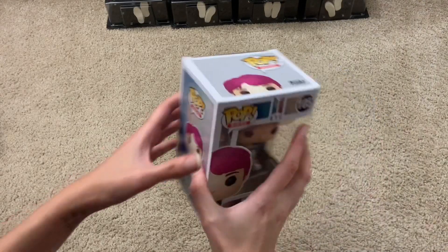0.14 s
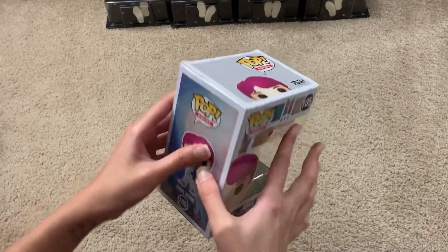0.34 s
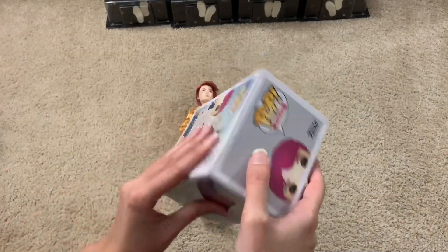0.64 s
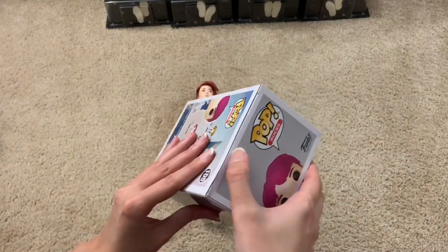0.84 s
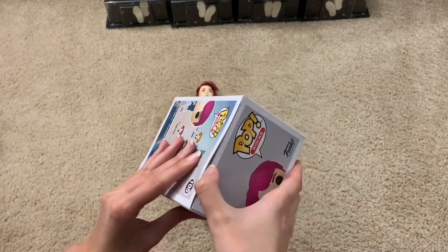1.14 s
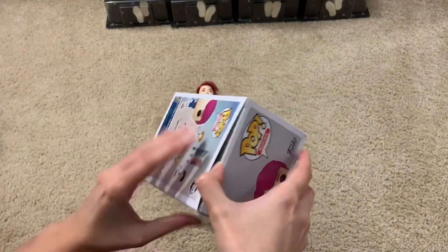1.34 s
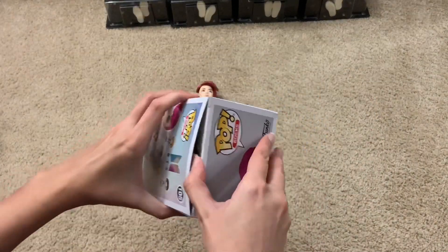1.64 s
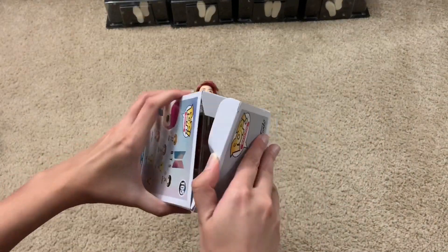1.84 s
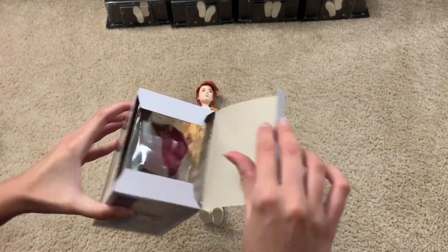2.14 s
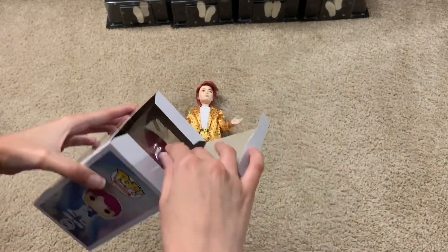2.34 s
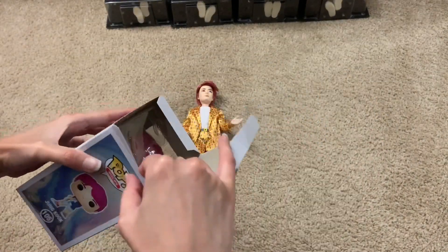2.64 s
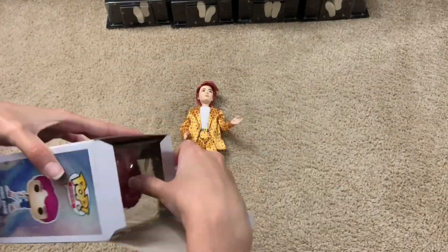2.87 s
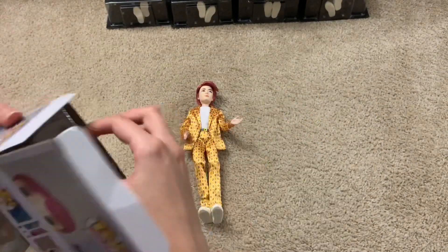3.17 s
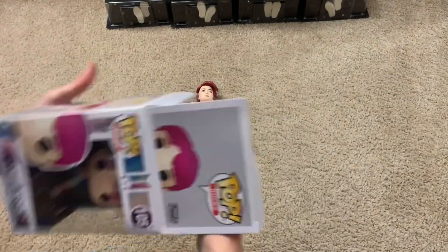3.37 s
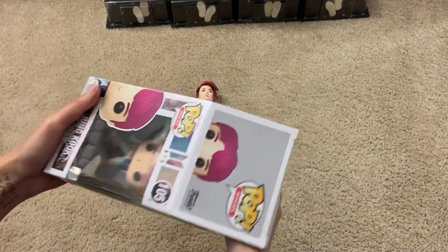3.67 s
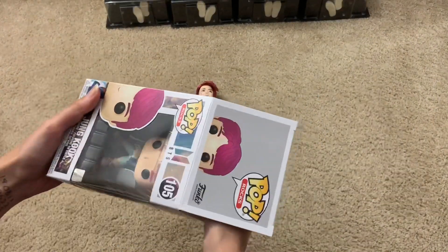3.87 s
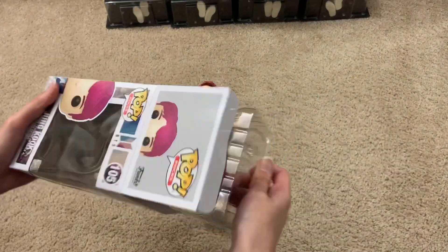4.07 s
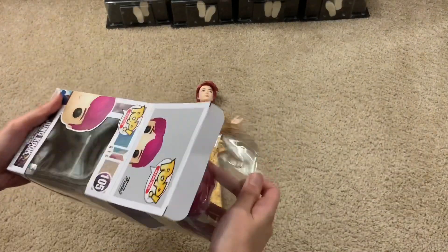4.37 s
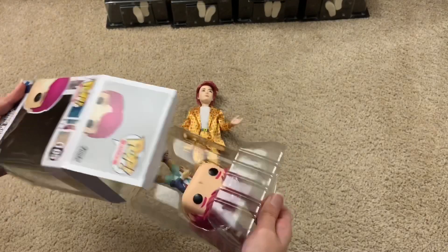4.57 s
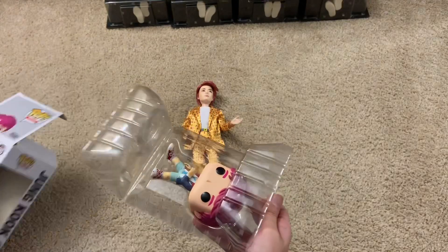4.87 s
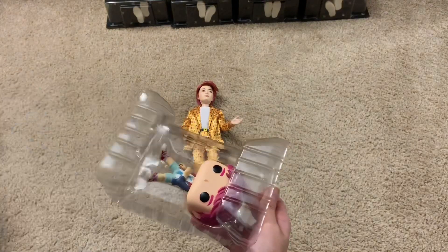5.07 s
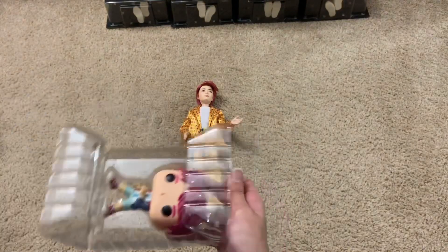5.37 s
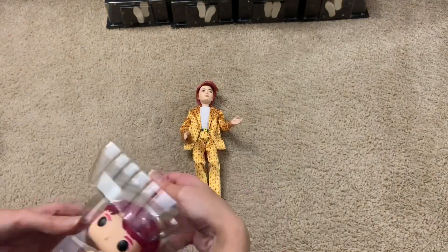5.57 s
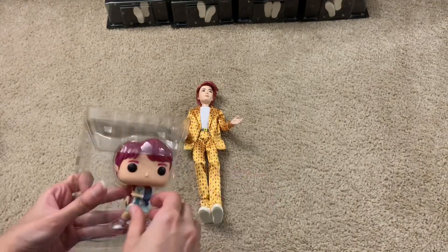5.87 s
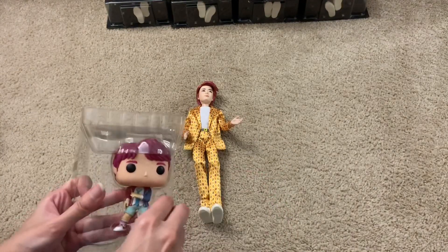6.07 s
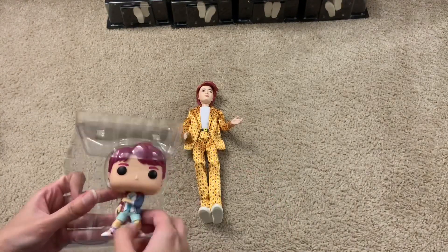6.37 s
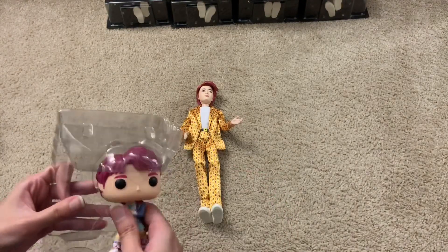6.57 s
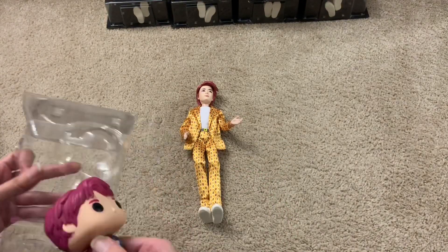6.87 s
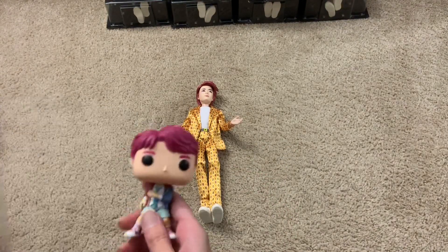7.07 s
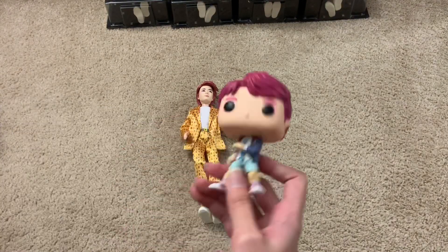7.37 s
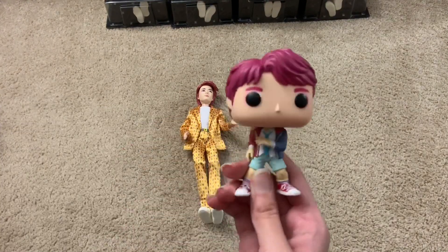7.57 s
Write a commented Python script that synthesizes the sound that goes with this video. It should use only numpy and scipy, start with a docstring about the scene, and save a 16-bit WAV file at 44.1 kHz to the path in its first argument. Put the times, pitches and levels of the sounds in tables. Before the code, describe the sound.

Very close stereo pickup, slightly left, in a small dull room with quiet low room tone and a faint motor hum. From 0 to 0.9 s hands turn a light card box: soft rubbing, dull ticks and one loud hollow knock near 0.36 s, with faint hiss and low air rumble fading by about 2 s. Sparse faint ticks follow until sharp flap snaps at 1.8 to 1.95 s. From 2 to 3.7 s there are small clicks, light card rustle and a soft box tap near 2.7 s. A hard snap at 3.76 s leads to the loudest cluster, 4.0 to 4.5 s, bright cracks and crinkling rubs as thin plastic slides out. Then lighter clicks, six very faint even blips around 5.2 to 5.5 s, crisp plastic ticks at 5.6 to 6.9 s, and sparse soft taps to the end. A distant engine drone rises, drops and settles, almost inaudible.

```python
"""Hands turn a small card box, open its flaps and draw out a thin plastic tray over a carpet.
Card and plastic snap as filtered noise bursts and rustle as gated friction noise; three knocks, one of
them loud, ring the box as decaying sines. Later come six even blips. A motor hums on two sines, a far
engine (one gliding sine) climbs, changes gear and settles; low air rumble and faint hiss open the scene."""
import sys
import numpy as np
from scipy import signal
from scipy.fft import rfft, irfft
from scipy.io import wavfile

SR = 44100
rng = np.random.default_rng(int(sys.argv[2]) if len(sys.argv) > 2 else 0)


def put_to_file(sound):
    """Save the sound as 16-bit audio at rate SR, in the file named by the first command-line argument."""
    columns = np.atleast_2d(sound).T  # one column per channel
    safe = np.clip(columns, -1, 1)
    whole_steps = np.round(safe * 32767)
    wavfile.write(sys.argv[1], SR, whole_steps.astype(np.int16))


N = 340011
RIGHT_LAG_S = 6e-5   # the box sits nearer the left port


def amp(db):
    """dB to gain."""
    return 10 ** (np.asarray(db) / 20)


def rms_one(x):
    """Scale to rms 1."""
    return x / np.sqrt(np.mean(x ** 2) + 1e-20)


def peak_one(x):
    """Scale to peak 1."""
    return x / (np.max(np.abs(x)) + 1e-20)


def in_time(rows):
    """Table columns after t/s as curves, one value a sample."""
    s, *columns = np.transpose(rows)
    return [np.interp(np.arange(N) / SR, s, c) for c in columns]


def resonate(x, hz, width_hz):
    """Two-pole resonance, gain about 1 on top."""
    r = np.exp(-np.pi * width_hz / SR)
    angle = 2 * np.pi * min(hz, SR / 2.2) / SR
    return signal.lfilter([(1 - r * r) / 2, 0, (r * r - 1) / 2], [1, -2 * r * np.cos(angle), r * r], x)


def body(x, peaks):
    """Resonances in parallel."""
    return sum(amp(db) * resonate(x, hz, width_hz) for hz, width_hz, db in peaks)


def band(x, low_hz, high_hz):
    """Butterworth band-pass."""
    return signal.sosfilt(signal.butter(2, [low_hz, high_hz], "band", fs=SR, output="sos"), x)


def drift(rate_hz):
    """Slow chance: straight lines between normal draws of spread 1."""
    steps = rng.standard_normal(int(N / SR * rate_hz) + 2)
    return np.interp(np.arange(N) / SR * rate_hz, np.arange(len(steps)), steps)


# shading by the housing: f/Hz, left re right/dB
PORT_SHADING = [(100, 4.5), (500, 3), (2500, 3), (5000, 1), (9000, -2), (14000, 0)]


def ports(x, lag_s):
    """Two channels, the right delayed by lag_s; the housing shades each by half the level difference."""
    hz = np.fft.rfftfreq(len(x), 1 / SR)
    shade_hz, shade_db = np.transpose(PORT_SHADING)
    tilt = amp(np.interp(np.log(hz + 1), np.log(shade_hz), shade_db) / 2)
    delay = np.exp(-2j * np.pi * hz * lag_s)
    return irfft(rfft(x) * [tilt, delay / tilt], len(x))


# ticks and snaps: t/s, level/dB, panel f/Hz, relative crack level/dB, relative thud level/dB, t60/s
PANEL_SNAPS = [(0.236, -30, 775, -7, -9, 0.15), (0.258, -24.5, 492, -17, -6, 0.15),
               (0.318, -22.5, 487, -18, 4, 0.15), (0.362, -4, 577, -11, 21, 0.021),
               (0.497, -35, 535, -24, 3, 0.045), (0.553, -43, 988, -23, -7, 0.061),
               (0.598, -17.5, 586, -20.5, -8, 0.15), (0.638, -19.5, 540, -22, -4, 0.13),
               (0.7, -21, 988, -19, 7, 0.033), (0.724, -27.5, 560, -26, -5, 0.043),
               (0.735, -21.5, 616, -12, 4, 0.05), (0.822, -32, 530, -26, 6, 0.11),
               (0.844, -24, 1510, -37, -27, 0.15), (0.892, -30.5, 1150, -34, -19, 0.034),
               (1.093, -34, 1280, -25.5, -13, 0.03), (1.305, -34.5, 1030, -12.5, -23, 0.05),
               (1.34, -31.5, 1740, -54, -35, 0.017), (1.401, -35, 1200, -46, -15.5, 0.068),
               (1.481, -32, 3180, -27, -32, 0.036), (1.5, -30.5, 1170, -25, -19, 0.086),
               (1.586, -24.5, 1210, -18.5, -3, 0.077), (1.6, -16, 1176, -32.5, -59, 0.031),
               (1.751, -32.5, 1050, -19, -27, 0.11), (1.8, -4.5, 2000, -16, -19.5, 0.039),
               (1.816, -2, 2870, -10.5, -26, 0.034), (1.848, -8, 1250, -12.5, -18.5, 0.032),
               (1.89, -33, 810, -33, -13, 0.05), (1.945, -4, 1280, -12, -36, 0.017),
               (1.991, -25, 1580, -8, -15, 0.054), (2.01, -25.5, 1140, -5.5, -29, 0.044),
               (2.105, -29, 1290, -13, -27, 0.03), (2.167, -28, 1590, -9, -16, 0.05),
               (2.211, -29.5, 1270, -9.5, -11, 0.05), (2.267, -35, 1060, -10.5, -19, 0.055),
               (2.303, -22, 910, -9.5, -21, 0.091), (2.356, -30, 850, -9, -8, 0.084),
               (2.374, -35, 483, -12, -24, 0.07), (2.428, -44.5, 1290, -30, -22, 0.025),
               (2.47, -50, 1220, -22.5, -17, 0.043), (2.527, -39.5, 2200, -8, -29, 0.042),
               (2.589, -32, 2100, -20, -30.5, 0.073), (2.646, -33.5, 2160, -40, -19, 0.028),
               (2.681, -16.5, 1260, -32, -34, 0.033), (2.789, -28.5, 1330, -10.5, -8, 0.15),
               (2.847, -35.5, 1250, -13, -13, 0.043), (2.912, -36.5, 560, -10.5, -16, 0.05),
               (2.953, -26.5, 1240, -7.5, -15, 0.13), (3.042, -31, 1230, -17.5, -16.5, 0.15),
               (3.128, -56, 1250, -22, -10, 0.05), (3.145, -42, 1160, -31, -17, 0.069),
               (3.256, -33.5, 1130, -8.5, -15.5, 0.05), (3.356, -42, 1160, -30, -20, 0.1),
               (3.403, -36.5, 1310, -32, -19, 0.05), (3.466, -26, 1200, -42, -18.5, 0.05),
               (3.507, -35, 2250, -32, -17, 0.042), (3.589, -24, 2160, -29, -19.5, 0.088),
               (3.653, -31, 1270, -37, -19, 0.05), (3.743, -21, 1160, -26, -30, 0.05),
               (3.763, -5, 2190, -17, -29.5, 0.036), (3.853, -27, 1280, -23, -34, 0.066),
               (3.936, -21, 1258, -20, -24.5, 0.05), (3.975, -14.5, 1280, -20, -22, 0.073),
               (4.03, -15.5, 2200, -18, -35, 0.029), (4.067, 0, 1203, -9.5, -21.5, 0.14),
               (4.088, -2.5, 2070, -19.5, -22, 0.035), (4.125, -3, 3200, -9.5, -17.5, 0.07),
               (4.147, -24, 848, -21, -10, 0.041), (4.208, -20, 1260, -35, -14, 0.1),
               (4.257, -10.5, 2110, -18, -19.5, 0.028), (4.31, -18, 3040, -9.5, -23, 0.05),
               (4.332, -9.5, 2305, -15.5, -16.5, 0.032), (4.391, -25.5, 583, -7.5, -10, 0.062),
               (4.417, -26.5, 864, -15, -13, 0.069), (4.477, -31, 2150, -12.5, -28, 0.05),
               (4.501, -8.5, 2330, -16.5, -17.5, 0.079), (4.536, -15.5, 495, -7.5, -20, 0.044),
               (4.621, -26, 1200, -17.5, -20, 0.15), (4.717, -24, 2270, -17, -19, 0.15),
               (4.741, -18, 1020, -14.5, -16.5, 0.05), (4.772, -23.5, 2600, -22, -16.5, 0.028),
               (4.844, -24, 1855, -12, -28, 0.11), (4.855, -19.5, 2200, -20.5, -13, 0.079),
               (4.928, -33, 401, -9, -23, 0.067), (5.008, -30.5, 2120, -22.5, -17, 0.05),
               (5.165, -34.5, 2080, -19, -13, 0.05), (5.307, -30, 1053, -9.5, -26.5, 0.053),
               (5.536, -52.5, 1568, -17, -17.5, 0.05), (5.594, -17, 1450, -9.5, -31, 0.033),
               (5.645, -30, 855, -9, -23, 0.05), (5.69, -11, 1500, -13, -19, 0.02),
               (5.728, -19, 3280, -7.5, -20, 0.05), (5.756, -22, 2200, -13, -16, 0.066),
               (5.861, -21.5, 1200, -8.5, -44, 0.054), (5.915, -27.5, 2180, -1, -25, 0.05),
               (5.954, -25, 2390, -21.5, -14.5, 0.065), (5.991, -24.5, 907, -6.5, -12, 0.031),
               (6.014, -27.5, 2334, -9, -29, 0.05), (6.06, -14, 2340, 2, -38, 0.045),
               (6.103, -32, 1866, -16, -13, 0.046), (6.149, -37, 2360, -34, -22.5, 0.043),
               (6.26, -16, 2167, -9, -30, 0.05), (6.327, -31.5, 2344, -14.5, -24, 0.05),
               (6.397, -32, 635, -10, -12, 0.05), (6.432, -25, 2313, -8.5, -27, 0.05),
               (6.45, -30, 1823, -12, -9, 0.021), (6.475, -19, 1570, -29, -27, 0.02),
               (6.514, -26, 640, -8, -39, 0.041), (6.537, -35.5, 1430, -16, -22, 0.035),
               (6.629, -31.5, 680, -5, -19, 0.055), (6.772, -17.5, 2240, -8, -28, 0.072),
               (6.813, -20.5, 653, -11.5, -13, 0.098), (6.908, -10, 1000, -11, -17, 0.05),
               (7.054, -36, 660, -28, -20, 0.037), (7.152, -36.5, 2086, -22.5, -18, 0.054),
               (7.199, -29, 1320, -9.5, -19, 0.11), (7.283, -22.5, 1210, -9, -16, 0.05),
               (7.317, -27, 922, -9.5, -8, 0.15), (7.394, -36, 1590, -25, -18.5, 0.046),
               (7.572, -33, 1350, -20, -9, 0.05), (7.684, -39, 600, -8.5, -12, 0.062)]
CRACK_HZ, CRACK_OCT_PER_DB, CRACK_KNEE_DB = 4000, 0.52, -10.5   # above the knee, stronger cracks sit higher
CRACK_CREST_DB, THUD_CREST_DB = 18, 9.5   # added to the table's relative levels


def snaps():
    """A panel creaks, lets go in one jolt and rattles out: its own pitch, a bright crack and a low thud."""
    size, jolt_s = 6000, .0025
    t = np.arange(size) / SR
    out = np.zeros((2, N + size))
    noises = rng.standard_normal((len(PANEL_SNAPS), size))
    lags = rng.normal(1, 0.47, len(PANEL_SNAPS))
    detunes = rng.uniform(.75, 1.35, len(PANEL_SNAPS))
    for (s, db, hz, crack_db, thud_db, t60_s), noise, lag, detune in zip(PANEL_SNAPS, noises, lags, detunes):
        creak = np.minimum(t / jolt_s, 1) ** 2
        rattle = amp(-60 * t / max(t60_s, .005)) + amp(-16.5 - 60 * t / 0.066)
        burst = noise * creak * rattle
        burst *= 1 + 2.7 * (np.abs(noise) > 2.2)   # separate small slips
        burst[round(jolt_s * SR)] += 2.89 * np.sign(noise[0])

        wide = resonate(burst, hz, 1.52 * hz)
        panel = resonate(wide, hz, 0.085 * hz) + resonate(wide, detune * hz, .5 * hz)
        panel = peak_one(panel + 0.28 * band(burst, 610, 2600))

        crack_hz = min(CRACK_HZ * 2 ** (CRACK_OCT_PER_DB * max(crack_db - CRACK_KNEE_DB, 0)), SR / 3)
        # treble spike, then weak sizzle
        bright = burst * (amp(-60 * np.abs(t - jolt_s) / 0.019) + amp(-14.0))
        crack = peak_one(band(resonate(bright, crack_hz, 0.37 * crack_hz) + 0.073 * bright, 1800, 18000))
        thud = peak_one(band(burst, 220, 1100))

        mix = panel + amp(crack_db + CRACK_CREST_DB) * crack + amp(thud_db + THUD_CREST_DB) * thud
        at = round((s - jolt_s / 2) * SR)
        out[:, at:at + size] += ports(amp(db) * peak_one(mix), lag * RIGHT_LAG_S)
    return out[:, :N]


# fingers on the closed box: t/s, level before trim/dB
BOX_KNOCKS = [(0.094, -38), (0.36, 2.5), (2.679, -21)]
# modes of the hollow box: f/Hz, relative level/dB, t60/s
BOX_MODES = [(143, -14.5, 0.16), (229, -8.5, 0.088), (298, -11, 0.11), (557.5, 7, 0.048), (667, 4, 0.042),
             (757, -7.5, 0.033), (1120, -12, 0.0088), (1200, 4.5, 0.015), (1400, -4, .035),
             (1590, -8.5, .03), (2000, -20, 0.022)]


def knocks():
    """A soft fingertip blow rings the modes of the hollow box; high modes speak first."""
    t, out = np.arange(8000) / SR, np.zeros(N)
    for s, db in BOX_KNOCKS:
        ring = 0
        for hz, mode_db, t60_s in BOX_MODES:
            decay = amp(mode_db + rng.normal(0, 1) - 60 * t / t60_s)
            onset = (1 - np.exp(-t * hz / 2.4)) ** 2
            ring = ring + decay * onset * np.sin(2 * np.pi * (hz * t + rng.random()))
        at = round(s * SR)
        out[at:at + len(t)] += amp(db - 4.5) * peak_one(ring)   # trim -4.5 dB
    return ports(out, RIGHT_LAG_S)


# strokes of skin or plastic over card: t/s, length/s, level/dB, brightness/dB
RUB_STROKES = [(0, 0.13, -55.5, -11.5), (0.249, 0.18, -43.5, -17), (0.495, 0.29, -42.5, -15),
               (0.848, 0.043, -42, -2.5), (.93, 0.084, -65.5, -6.5), (1.202, 0.21, -61, -5.5),
               (1.482, 0.21, -57, -5.5), (1.79, 0.051, -38, -9), (1.939, 0.096, -51, 1.5),
               (2.11, 0.26, -62.5, 4), (2.57, 0.13, -59.5, -10), (2.776, 0.07, -51, 0),
               (2.931, 0.24, -55, 2), (3.239, 0.26, -54, -3), (3.534, 0.15, -50, -9), (3.761, 0.17, -47, 1),
               (3.985, .22, -36.5, 2.5), (4.262, 0.081, -40.5, -1.5), (4.393, 0.15, -42, 5.5),
               (4.562, 0.21, -46, 5.5), (4.836, .22, -63, -11.5), (5.326, 0.089, -61, -5),
               (5.574, .08, -62, 2), (5.699, 0.062, -40.5, 1), (5.88, 0.094, -62, 2.5),
               (6.001, 0.16, -53.5, 0.5), (6.229, 0.25, -58.5, 2.5), (6.593, 0.27, -56, 3.5),
               (7.18, .1, -60.5, -4.5), (7.308, 0.16, -52.5, -3.5), (7.6, .11, -59.5, -8.5)]
STROKE_RISE_DB_PER_S, STROKE_FALL_DB_PER_S, STROKE_SWELL_DB = 598, 391, 1.5
SCRATCH_DB, HISS_DB, HISS_FOLLOWS = -1, -9.5, 1.1   # re body; hiss takes brightness x 1.1


def strokes():
    """Each stroke rises fast, swells slightly while it lasts and falls away; gains of body, scratch, hiss."""
    t, gains = np.arange(0, N + 64, 64) / SR, 0
    for s, length_s, db, bright_db in RUB_STROKES:
        swell_db = STROKE_SWELL_DB * np.clip((t - s) / length_s, 0, 1)
        rise_db = STROKE_RISE_DB_PER_S * np.maximum(s - t, 0)
        fall_db = STROKE_FALL_DB_PER_S * np.maximum(t - s - length_s, 0)
        layers_db = [[0], [SCRATCH_DB + bright_db], [HISS_DB + HISS_FOLLOWS * bright_db]]
        gains = gains + amp(db + swell_db - rise_db - fall_db + layers_db)
    return [np.interp(np.arange(N) / SR, t, g) for g in gains]


CATCHES_PER_S, CATCH_T60_S, CATCH_GAIN = 35, 0.11, 1.7


def catches():
    """The surface catches and lets go: random sudden swells of friction that die away fast."""
    kicks = (rng.random(N) < CATCHES_PER_S / SR) * rng.random(N)
    return 1 + CATCH_GAIN * signal.lfilter([1], [1, -amp(-60 / (CATCH_T60_S * SR))], kicks)


def crinkles(per_s, count):
    """Tiny creases let go at random, each ringing briefly at one of count pitches."""
    fires = rng.random(N) < per_s / SR
    sizes = fires * amp(2.89 * np.minimum(rng.exponential(1, N), 4)) * rng.choice([-1, 1], N)
    dealt = rng.integers(0, count, N)
    out = 0
    for k, hz in enumerate(np.geomspace(400, 15000, count)):
        out = out + resonate(sizes * (dealt == k) + 1e-18, hz, 0.89 * hz) / np.sqrt(hz)
    return rms_one(out)


# friction resonances, low to high layer: f/Hz, width/Hz, relative level/dB
BODY_PEAKS = [(326, 46, -7), (616, 59, 1.5), (1000, 820, 1), (1280, 3600, -9)]
SCRATCH_PEAKS = [(2200, 390, -6), (3556, 2400, -2.5), (5140, 500, -11)]
HISS_PEAKS = [(6500, 7500, 5.5), (10200, 18000, -15.5), (14800, 3300, -15.5)]


def rubbing():
    """Skin and plastic slip over card: uneven friction noise and crinkles, in three layers."""
    clumps = catches() * amp(np.minimum(4 * drift(40) + 3 * drift(150), 5))
    source = ports(clumps * (rng.standard_normal(N) + 0.42 * crinkles(700, count=24)), RIGHT_LAG_S)
    spread = clumps * rng.standard_normal((2, N))   # independent per port
    body_gain, scratch_gain, hiss_gain = strokes()
    low = rms_one(band(body(source + 0.11 * spread, BODY_PEAKS), 250, 1700))
    scratch = rms_one(band(body(source + .2 * spread, SCRATCH_PEAKS), 1700, 3700))
    hiss = rms_one(band(body(source + 1.9 * spread, HISS_PEAKS), 5000, 18000))
    return body_gain * low + scratch_gain * scratch + hiss_gain * amp(2.0 * drift(42)) * hiss


# soft blips: first t/s, spacing/s, f/Hz, level/dB
EVEN_BLIPS = (5.224, .0552, 1040, -49)


def blips(count):
    """A short dull ring of two cascaded resonances, repeated at an even pace."""
    first_s, spacing_s, hz, db = EVEN_BLIPS
    clicks = np.zeros(N)
    at = np.round((first_s + spacing_s * np.arange(count)) * SR).astype(int)
    clicks[at] = amp(rng.normal(0, 1.4, count))
    ring = resonate(resonate(clicks + 1e-18, hz, hz / 7), hz, hz / 2)
    return amp(db) * ports(peak_one(ring + 0.11 * band(clicks, hz, 2.0 * hz)), RIGHT_LAG_S)


ROOM_T60_S, ROOM_DB, WALL_CUT_HZ = 0.13, -15, 11000


def room(x):
    """Short, dull, diffuse tail: decaying noise, its own in each channel."""
    t = np.arange(round(.4 * SR)) / SR
    tail = rng.standard_normal((2, len(t))) * amp(-60 * t / ROOM_T60_S) * (t > .004)
    tail = signal.sosfilt(signal.butter(1, WALL_CUT_HZ, fs=SR, output="sos"), tail)
    tail /= np.sqrt(np.sum(tail ** 2, axis=1, keepdims=True))
    return amp(ROOM_DB) * signal.fftconvolve(x, tail, axes=1)[:, :N]


# far engine: t/s, f/Hz, relative level/dB
ENGINE_COURSE = [(2.0, 152.4, -99), (2.17, 167.2, -60.5), (2.451, 180, -63.5), (3.0, 205, -59),
                 (3.11, 192, -70), (3.3, 216.3, -67), (3.5, 220.6, -62), (3.65, 198.3, -55),
                 (3.95, 148, -58.5), (4.852, 143, -54.5), (4.959, 138.8, -48), (5.15, 139.9, -56),
                 (5.54, 136, -58), (6.3, 141, -53.5), (7.29, 142.9, -51.5), (7.71, 147.3, -54.5)]


def engine():
    """One firing tone reaches the room, wavering in pitch and level."""
    start_hz = ENGINE_COURSE[0][1]
    hz, db = in_time([(0, start_hz, -90.5), (1.8, start_hz, -77)] + list(ENGINE_COURSE))
    waver_db, waver_hz = 2.5 * drift(14), 2.5 * drift(20)
    return amp(db + 4.5 + waver_db) * np.sin(2 * np.pi * np.cumsum(hz + waver_hz) / SR)


# motor lines: f/Hz, relative level/dB
MOTOR_LINES = [(58, -64), (115.5, -55)]


def hum():
    """Motor lines at fixed pitch that waver a little in level."""
    t = np.arange(N) / SR
    return sum(amp(db + 1.7 * drift(18)) * np.sin(2 * np.pi * hz * t) for hz, db in MOTOR_LINES)


# air movement: t/s, deep level/dB, low level/dB
RUMBLE_COURSE = [(0.0, -63, -45), (0.48, -59, -42.5), (0.51, -43, -40), (0.64, -41, -41),
                 (0.69, -42.5, -38), (1.04, -47.5, -44), (1.12, -77, -58), (1.22, -51, -39),
                 (1.32, -42.5, -46), (1.52, -70, -56), (1.98, -83, -77), (2.0, -82, -78)]


def rumble():
    """Low air movement at the ports while the box swings past: two noise bands that die away."""
    deep_db, low_db = in_time(list(RUMBLE_COURSE) + [(2.1, -100, -100)])
    shared = rng.standard_normal((2, 1, N))
    deep, low = shared + .12 * rng.standard_normal((2, 2, N))
    return amp(deep_db) * rms_one(band(deep, 24, 54)) + amp(low_db) * rms_one(band(low, 27, 95))


EARLY_HISS_DB, EARLY_HISS_END_S, EARLY_HISS_FALL_DB_PER_S = -70, 1.034, 300


def early_hiss():
    """Smooth, faint treble noise that fades quickly after the first second."""
    fade_db = -EARLY_HISS_FALL_DB_PER_S * np.maximum(np.arange(N) / SR - EARLY_HISS_END_S, 0)
    white = rng.standard_normal(N) + 1.1 * rng.standard_normal((2, N))
    return amp(EARLY_HISS_DB + fade_db) * rms_one(band(white, 3500, 20000))


# room tone spectrum: f/Hz, relative density/dB
AIR_SPECTRUM = [(12, -54), (20, -14.5), (130, -1), (193, -7.5), (357, -19.5), (678, -28), (1060, -24),
                (1370, -40), (2200, -36.5), (2910, -44.5), (13500, -58), (16000, -68.5)]
AIR_DB = -56.5


def air():
    """Quiet room tone: shaped noise, mostly alike in both ports."""
    hz, db = np.transpose(AIR_SPECTRUM)
    grid_hz = np.fft.rfftfreq(N, 1 / SR) + 1
    white = rng.standard_normal(N) + 0.22 * rng.standard_normal((2, N))
    shape = amp(np.interp(np.log(grid_hz), np.log(hz), db))
    return amp(AIR_DB) * rms_one(irfft(rfft(white) * shape, N))


def scene():
    """Hands on the packaging in the room, over the background."""
    hits = snaps() + knocks() + blips(count=6)
    tones = (engine() + hum()) * amp([[.6], [-.6]])
    return hits + room(hits) + rubbing() + tones + rumble() + early_hiss() + air()


CUTOFF_HZ = 17150


def record(dry):
    """Peaks overload at 0.94 of full scale; the top edge rolls off, then is cut."""
    clipped = np.clip(dry, -.94, .94)
    soft = signal.sosfilt(signal.butter(2, 16600, fs=SR, output="sos"), clipped)
    return signal.sosfilt(signal.cheby2(12, 60, CUTOFF_HZ, fs=SR, output="sos"), soft)


dry = scene()
out = record(dry)
put_to_file(out)
```